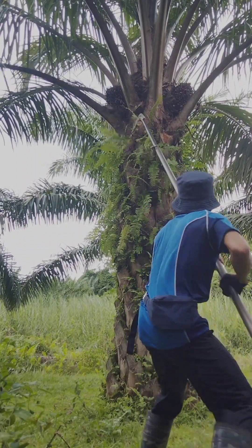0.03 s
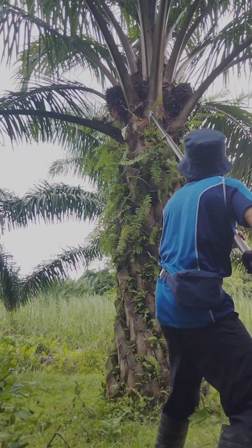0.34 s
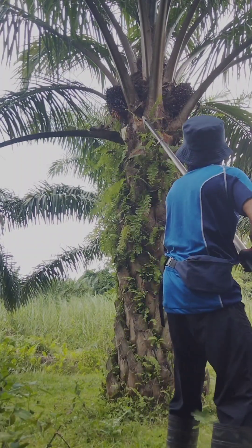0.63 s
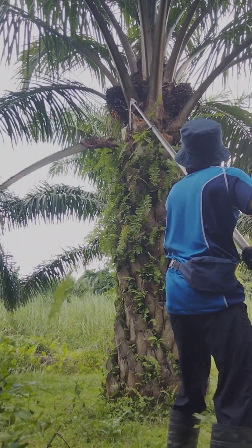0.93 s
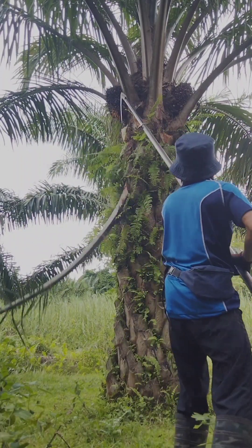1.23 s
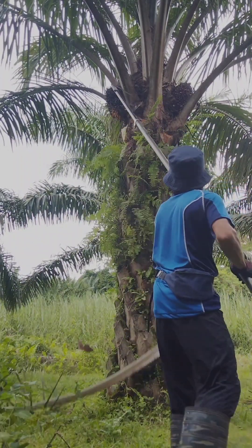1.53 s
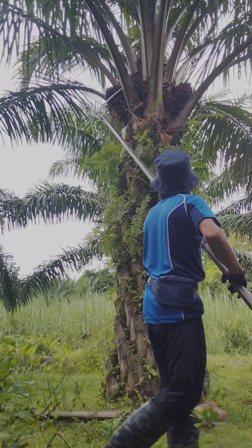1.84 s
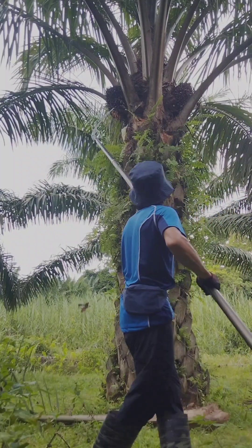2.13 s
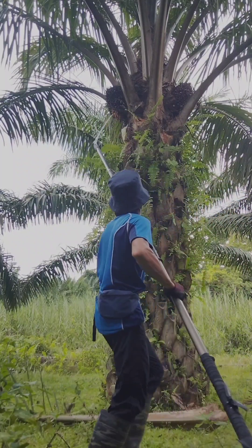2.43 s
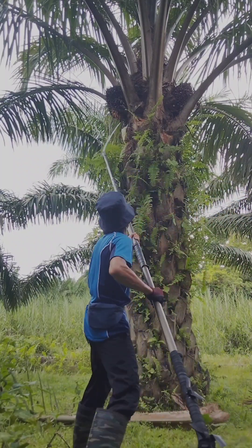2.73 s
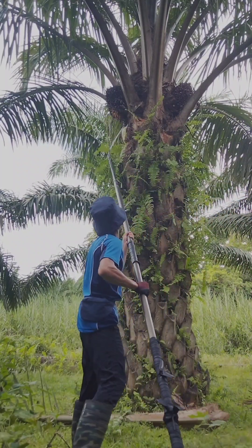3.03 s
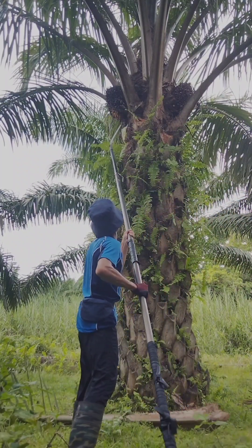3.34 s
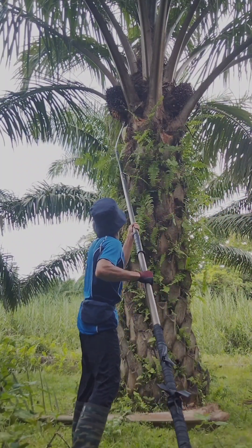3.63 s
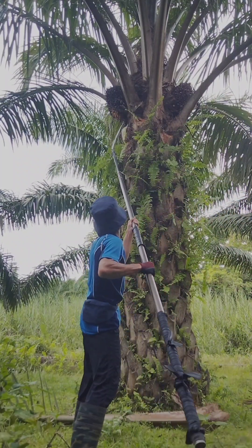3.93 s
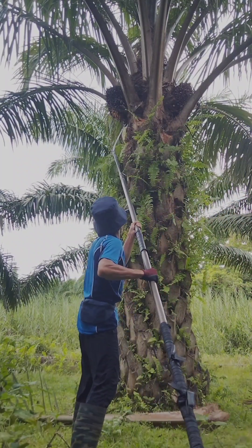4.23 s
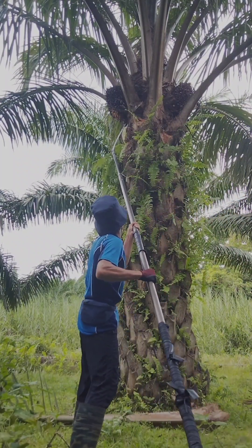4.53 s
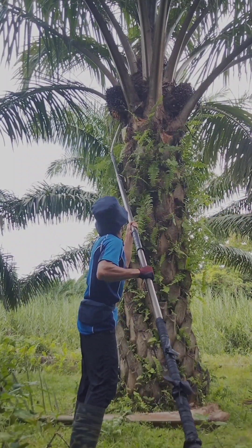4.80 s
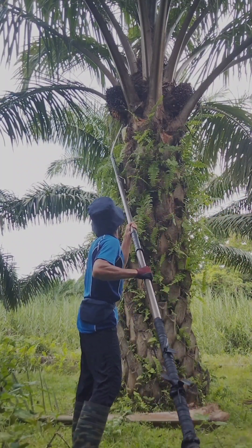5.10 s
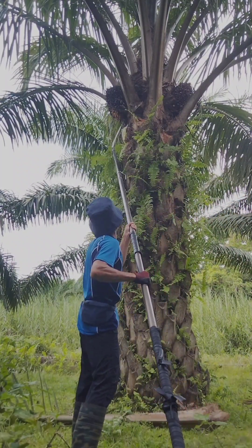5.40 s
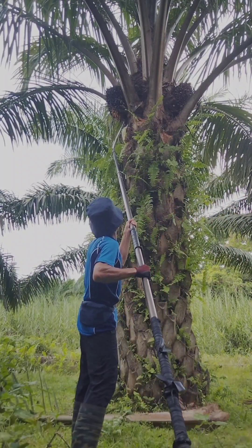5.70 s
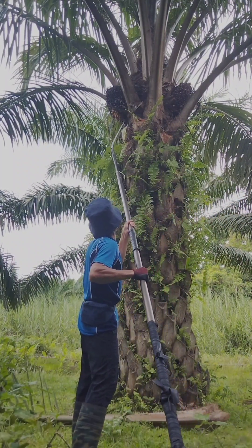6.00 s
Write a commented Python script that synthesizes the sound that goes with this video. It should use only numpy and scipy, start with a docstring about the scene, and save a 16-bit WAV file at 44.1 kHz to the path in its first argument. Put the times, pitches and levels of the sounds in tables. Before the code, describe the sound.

Woody cracks, rustling leaves and a thud as a palm frond falls, followed by light blade scrapes, insects and faint birds.

```python
"""Insects buzz and a far engine hums as a harvester cuts an oil palm frond with a sickle on a long pole.
The stalk tears in woody cracks, fibre by fibre, and the leaflets swish down; at 1.6 s the heavy butt
thumps on the grass and the frond settles. From 3 s the blade brushes and knocks through the ferns on the
trunk, pole and steel ringing along, while one far bird calls twice and another whistles faintly."""
import sys
import numpy as np
from scipy import signal
from scipy.fft import rfft, irfft
from scipy.io import wavfile

SR = 44100
rng = np.random.default_rng(int(sys.argv[2]) if len(sys.argv) > 2 else 0)


def generate_wav(signal):
    """Clip the signal to [-1, 1] and save it as 16-bit WAV at the path in sys.argv[1]."""
    frames = np.transpose(np.atleast_2d(signal))
    scaled = np.clip(frames, -1, 1) * 32767
    pcm = np.round(scaled).astype(np.int16)
    wavfile.write(sys.argv[1], SR, pcm)


N = 267246
TIME = np.arange(N) / SR

# Tone of the bed, far rumble up to leaf hiss: f/Hz, level/dB
AIR_EQ = [(20, -8), (43, -7), (58, -10), (85, 5), (170, 3.5), (280, 0), (550, -11), (1200, -11.5),
          (3500, -14), (6000, -19), (11000, -19), (14500, -13)]
# Partials of the engine hum: f/Hz, level/dB
ENGINE_PARTIALS = [(159, -69), (187, -68.5)]
# Insect choruses: f/Hz, width/Hz, level/dB
INSECT_BANDS = [(8560, 700, -66.5), (4650, 810, -79)]
# Bird phrase, a soft twitter and four slurs: t/s into the phrase, length/s, top f/Hz, drop/share, level/dB
BIRD_PHRASE = [(.02, .09, 3850, .13, -62), (.137, .046, 3800, .18, -55), (.184, .04, 3500, .33, -51.5),
               (.254, .054, 3750, .38, -51), (.316, .044, 2900, .35, -55.5)]
# Cues for that phrase: t/s
PHRASE_CUES = [3.198, 4.74]
# The second bird's whistles: t/s, f/Hz
BIRD_WHISTLES = [(2.92, 4700), (4.457, 4620), (4.575, 4230), (6.02, 4700)]

# The blade brushes the ferns: t/s, rise/s, level/dB
FERN_BRUSHES = [(2.981, 0.035, -46.5), (3.308, 0.026, -42), (3.515, 0.029, -47.5), (3.691, 0.012, -37.5),
                (3.725, .01, -40.5), (3.935, 0.019, -49.5), (3.978, 0.0096, -42.5), (4.2, 0.035, -55.5),
                (4.318, 0.013, -45.5), (4.861, 0.04, -41), (5.287, 0.008, -34), (5.621, .008, -37),
                (5.87, .025, -50)]
# The blade knocks on the trunk: t/s, level/dB
TRUNK_KNOCKS = [(2.971, -55), (3.305, -41.5), (3.52, -46.5), (3.719, -42), (3.927, -47), (3.977, -40),
                (4.107, -47.5), (4.313, -43.5), (4.85, -45.5), (5.283, -46.5)]
# Tone of the ferns and of the trunk: f/Hz, level/dB
FERN_EQ = [(150, -7.5), (700, -7.5), (2200, -2), (3700, 1.5), (6000, 2.5), (9000, 5), (13000, 3),
           (16000, 6)]
TRUNK_EQ = [(80, -31), (250, -2), (550, -2.5), (1000, -0.5), (1700, -3.5), (2700, -11), (8000, -51)]
# Ring of the steel blade and of the hollow pole: f/Hz, width/Hz, level/dB
STEEL_RING = [(2149, 11, 14.5), (3320, 32, -15.5), (3590, 53, -2.5), (4800, 40, 1), (5310, 71, 1),
              (6250, 160, -3)]
POLE_RING = [(423, 32, 3.1), (636, 15, 13.4), (1142, 28, 1.7), (1630, 16, 1.8), (2194, 25, 1.4)]

# Rustle of the frond as it swings down, then as it flops over and settles in the grass: t/s, level/dB
FALL_ENVELOPE = [(0.0, -20), (0.11, -34), (0.132, -29.5), (0.322, -37), (0.38, -33), (0.744, -37.5),
                 (0.876, -27), (1.0, -34), (1.168, -34.5), (1.23, -30.5), (1.314, -34), (1.364, -28),
                 (1.59, -31)]
SETTLE_ENVELOPE = [(1.615, -26.5), (1.685, -27), (1.747, -24.5), (1.867, -35.5), (1.889, -30), (2.139, -39),
                   (2.237, -46.5), (2.805, -55.5), (2.88, -57)]
# Short bright ticks: single leaflets snap, and the tick at 1.61 s sharpens the stalk's split: t/s, level/dB
LEAFLET_SNAPS = [(0.1517, -20.5), (1.6095, -11), (2.087, -26), (2.456, -37), (2.7873, -39), (3.686, -26),
                 (5.263, -35)]
# Tone of the leaflets and of the low swish: f/Hz, level/dB
LEAF_EQ = [(100, -39), (500, -9.5), (1300, -10), (2200, -10), (3300, -4.5), (5000, -2), (9000, 0),
           (16000, -3.5)]
SWISH_EQ = [(30, -69), (70, -6), (150, 3.5), (300, 0.5), (600, 0), (1000, -4.5), (2000, -14), (6000, -61)]

# The stalk crushes its own base, then the ferns, at last the grass: t/s, level/dB
CRUNCH_HITS = [(0.01, -29), (.89, -42), (1.632, -32), (1.735, -42.5)]
# Tone of that crunch: f/Hz, level/dB
CRUNCH_EQ = [(150, -28), (450, -1), (720, 0), (1100, -18), (3000, -38)]
# The stalk hits the ground, thin end first: t/s, f/Hz, level/dB, t60/s
GROUND_THUMPS = [(1.611, 565, -24.5, 0.098), (1.617, 276, -24.5, 0.124), (1.633, 464, -15.5, 0.022),
                 (1.643, 164.3, -20.5, 0.1), (1.731, 300, -31.5, 0.025), (1.797, 130, -20.5, 0.017)]

# Fibres of the stalk give way: t/s, length/s, level/dB
FIBRE_CRACKS = [(.01, 0.017, -18.5), (0.04, 0.041, -22), (0.103, 0.0093, -29), (0.161, 0.013, -30.5),
                (.237, 0.0097, -29.5), (0.283, 0.011, -30.5), (0.346, 0.0098, -27.5), (0.401, 0.016, -29.5),
                (.51, 0.01, -21), (0.75, 0.0072, -36), (0.903, 0.013, -32.5), (1.226, 0.021, -33),
                (1.289, 0.019, -36), (1.384, 0.0072, -26.5), (1.618, 0.0065, -29), (1.732, 0.014, -50)]
# The stalk splits with a sharp, bright report: t/s, length/s, level/dB
STALK_SPLITS = [(1.2342, 0.0028, -15.5), (1.6124, 0.028, -24)]
# Pan of the woody cracks: t/s, left minus right/dB
CRACK_PAN = [(.03, 9), (.2, 3), (1.4, -2.5), (1.6, 6)]
# Tone of the breaking wood: f/Hz, level/dB
WOOD_EQ = [(60, -23), (200, -13.5), (480, -9), (750, -0.5), (1200, -4), (2000, 1), (3200, 4), (8000, -57)]
# Ring of the stalk: f/Hz, width/Hz, level/dB
STALK_RING = [(540, 140, -7), (800, 56, -30), (1193, 52, 6), (1641, 18, 10.5), (2040, 39, -2),
              (2595, 63, 4.5)]

# Each microphone port has its own resonance: f/Hz, level/dB
LEFT_PORT_EQ = [(100, -2), (600, 0), (1500, -0.5), (3600, -1), (5300, -11), (9000, -10), (12000, -5),
                (14000, 1), (15800, -15)]
RIGHT_PORT_EQ = [(100, 0.78), (1300, 3.17), (2600, 6.1), (4400, 2.8), (6300, 3.6), (7500, 8.4),
                 (8300, 11.9), (8850, 17.1), (9300, 17.8), (10000, 11.9), (11000, 8.6), (14300, 5.6),
                 (15600, 9.3)]


def from_db(db):
    """Fader level to linear gain."""
    return 10 ** (np.asarray(db) / 20)


def rms_one(x):
    """Normalise to an rms of 1."""
    return x / np.sqrt(np.mean(x ** 2) + 1e-20)


def panned(left_db):
    """Stereo gains for a fixed or moving left-minus-right level."""
    return from_db(np.vstack([left_db, -left_db]) / 2)


def from_ahead(x):
    """Place a source just right of centre: it reaches the left side 6 samples late."""
    return np.array([np.interp(TIME - 6 / SR, TIME, x), x])


def drift(rate_hz):
    """Random modulator that glides from value to value; rms 1."""
    knots = rng.standard_normal(int(N / SR * 400))
    return rms_one(np.interp(TIME * rate_hz, np.arange(len(knots)), knots))


def equalised(x, curve, size=4096):
    """Minimum-phase EQ that follows a curve of f/Hz, level/dB."""
    hz, db = np.transpose(curve)
    grid = np.maximum(np.arange(size // 2 + 1) * SR / size, 1)
    gain = from_db(np.interp(np.log(grid), np.log(hz), db))
    cepstrum = irfft(np.log(gain))
    cepstrum[1:size // 2] *= 2
    cepstrum[size // 2 + 1:] = 0
    impulse = irfft(np.exp(rfft(cepstrum)))
    return signal.oaconvolve(x, impulse[None], axes=-1)[:, :N]


def stereo_noise(focus):
    """White noise, from fully wide (focus 0) to a point source (focus 1)."""
    shared = from_ahead(rng.standard_normal(N))
    return np.sqrt(focus) * shared + np.sqrt(1 - focus) * rng.standard_normal((2, N))


def grains(curve, per_s, spread_db, grain_s, focus):
    """Texture of countless tiny contacts of uneven size, each a fast-dying noise burst; rms 1."""
    sizes = from_db(spread_db * np.minimum(rng.exponential(1, N), 4))
    onsets = rng.random(N) < per_s / SR
    power = signal.lfilter([1], [1, -np.exp(-2 / (grain_s * SR))], onsets * sizes ** 2 + 1e-18)
    return rms_one(equalised(np.sqrt(power) * stereo_noise(focus), curve))


def hit_envelope(hits):
    """Each hit (t/s, rise/s, fall/s, level/dB) swells to its peak at t and dies away."""
    power = np.zeros(N)
    for s, rise, fall, db in hits:
        near = slice(max(int((s - .2) * SR), 0), int((s + .4) * SR))
        t = TIME[near] - s
        decay = np.minimum(np.abs(t) / np.where(t < 0, rise, fall), 20)
        power[near] += (from_db(db) * np.exp(-decay)) ** 2
    return np.sqrt(power)


def ringing(x, modes):
    """Layer a body's resonances over the contact noise; rms 1."""
    out = x
    for hz, width, db in modes:
        out = out + from_db(db) * signal.lfilter(*signal.iirpeak(hz, hz / width, fs=SR), x)
    return rms_one(out)


def butter(x, order, hz, kind="low"):
    """Butterworth low-, high- or band-pass."""
    return signal.sosfilt(signal.butter(order, hz, kind, fs=SR, output="sos"), x)


def among_palms(x, wet_db, t60, predelay_s=.006):
    """Trunks and crowns scatter a short, thin reverb tail."""
    t = TIME[:SR // 2]
    tail = rng.standard_normal((2, len(t))) * from_db(-60 * t / t60) * (t > predelay_s)
    tail /= np.sqrt(np.sum(tail ** 2, axis=1, keepdims=True))
    return x + from_db(wet_db) * signal.oaconvolve(x, tail, axes=-1)[:, :N]


def ground_bounce(x, delay_s, echo_db, grass_hz):
    """Sound from high on the palm also arrives off the ground, later and duller, and turns hollow."""
    echo = np.pad(x, [(0, 0), (round(delay_s * SR), 0)])[:, :N]
    return x + from_db(echo_db) * butter(echo, 1, grass_hz)


def plantation(air_db):
    """The bed: far rumble, leaf hiss, a wavering engine hum and narrow bands of insect buzz."""
    receding = from_db(np.interp(TIME, [2.6, 5.8], [2.0, -1.5]))   # the engine slowly moves away
    rumble = receding * butter(stereo_noise(1.0), 2, 600)
    hiss = butter(stereo_noise(0.094), 2, 600, "high")
    bed = from_db(air_db + drift(4.384)) * rms_one(equalised(rumble + hiss, AIR_EQ))
    for hz, db in ENGINE_PARTIALS:
        level = receding * from_db(db + 2.0 * drift(21))
        pitch = hz + 2.63 * drift(6.2)
        bed += level * np.sin(2 * np.pi * np.cumsum(pitch) / SR)
    for hz, width, db in INSECT_BANDS:
        level = from_db(db + 0.62 * drift(13))
        buzz = butter(stereo_noise(0.081), 2, [hz - width / 2, hz + width / 2], "band")
        bed += level * rms_one(buzz)
    return bed * panned(-4.0)


def birds(waver=.03, flutter_db=5.0, swell_db=5, whistle_s=.03, whistle_db=-63):
    """One bird repeats rough notes that rise, turn and swell as they drop; another adds thin whistles."""
    out = np.zeros(N)
    unsteady = 1 + waver * drift(220)
    flutter = flutter_db * drift(180)
    turn = .35   # the pitch peaks this far through a note
    for cue in PHRASE_CUES:
        for s, length, top_hz, drop, db in BIRD_PHRASE:
            note = int((cue + s) * SR) + np.arange(int(length * SR))
            along = np.linspace(0, 1, len(note))
            pitch = top_hz * (1 - drop * np.abs(along - turn) / (1 - turn)) * unsteady[note]
            level = from_db(db + flutter[note] - swell_db * (1 - along))
            fades = signal.windows.tukey(len(note), .2)
            out[note] += level * fades * np.sin(2 * np.pi * np.cumsum(pitch) / SR)
    for s, hz in BIRD_WHISTLES:
        level = from_db(whistle_db) * np.exp(-((TIME - s) / whistle_s) ** 2)
        out += level * np.sin(2 * np.pi * np.cumsum(hz * unsteady) / SR)
    return from_ahead(out)


def sickle(fern_fall_s=0.042, knock_rise_s=0.0051, knock_fall_s=0.015, scuff_db=-12.5):
    """The blade scuffs the fibrous trunk and shakes the ferns; the pole and the steel ring along."""
    brushes = hit_envelope([(s, rise, fern_fall_s, db) for s, rise, db in FERN_BRUSHES])
    knocks = hit_envelope([(s, knock_rise_s, knock_fall_s, db) for s, db in TRUNK_KNOCKS])
    on_trunk = np.hypot(knocks, from_db(scuff_db) * brushes)   # every brush also scuffs the trunk
    scuff = grains(TRUNK_EQ, per_s=1000, spread_db=3.0, grain_s=0.0012, focus=0.82)
    ferns = grains(FERN_EQ, per_s=4500, spread_db=3.5, grain_s=0.0019, focus=0.24)
    pole = on_trunk * ringing(scuff, POLE_RING) * panned(0.62)
    blade = brushes * ringing(ferns, STEEL_RING) * panned(-0.16)
    return pole + blade


def falling_frond(rustle_db, swish_db, settle_db_per_s=5):
    """Leaflets brush each other as the frond swings down and settles; a low swish adds body."""
    s, db = np.transpose(np.vstack([FALL_ENVELOPE, SETTLE_ENVELOPE]))
    fade_db = settle_db_per_s * np.maximum(TIME - s[-1], 0)
    motion = from_db(np.interp(TIME, s, db) - fade_db)
    rustle = from_db(rustle_db) * grains(LEAF_EQ, per_s=4100, spread_db=2.5, grain_s=0.0063, focus=0.37)
    swish = from_db(swish_db) * grains(SWISH_EQ, per_s=1300, spread_db=1.5, grain_s=0.0036, focus=1.0)
    left_db = np.interp(TIME, [.3, 1.1, 1.65, 2.4], [3.0, 4, 5.5, -2.0])   # it falls to the left
    return motion * (rustle + swish) * panned(left_db)


def leaflet_snaps(fall_s):
    """Dry leaflets break with one short tick each; one tick also sharpens the stalk's split."""
    clicks = np.zeros(N)
    for s, db in LEAFLET_SNAPS:
        clicks[int(s * SR)] = from_db(db)
    envelope = signal.lfilter([1], [1, -np.exp(-1 / (fall_s * SR))], clicks + 1e-18)
    return envelope * equalised(stereo_noise(0.88), LEAF_EQ)


def crunch(rise_s, fall_s):
    """Fibres and stems give way under the heavy stalk with a dull crunch."""
    weight = hit_envelope([(s, rise_s, fall_s, db) for s, db in CRUNCH_HITS])
    stems = grains(CRUNCH_EQ, per_s=1200, spread_db=2.5, grain_s=0.0024, focus=0.82)
    return weight * stems * panned(5.0)


def landing(low_cut_hz):
    """Ever heavier parts of the stalk meet the soft ground in a run of damped thuds."""
    thuds, t = np.zeros(N), TIME[:SR // 2]
    for s, hz, db, t60 in GROUND_THUMPS:
        start = int(s * SR)
        thuds[start:start + len(t)] += from_db(db - 60 * t / t60) * np.sin(2 * np.pi * hz * t)
    thuds = butter(thuds, 3, low_cut_hz, "high")   # a narrow stalk radiates little deep bass
    return from_ahead(thuds) * panned(6.4)


def tearing_stalk(wood_top_hz=1990, splinter_db=-8.5, crack_rise_share=0.59, split_rise_s=.0008):
    """Fibre bundles break in quick runs; the stalk lends a woody ring, splinters a bright edge."""
    fibres = grains(WOOD_EQ, per_s=760, spread_db=1.0, grain_s=0.00086, focus=0.94)
    wood = butter(ringing(fibres, STALK_RING), 3, wood_top_hz)
    splinters = grains(LEAF_EQ, per_s=3500, spread_db=3.3, grain_s=0.00033, focus=0.24) * panned(14.0)
    cracks = hit_envelope([(s, crack_rise_share * length, length, db) for s, length, db in FIBRE_CRACKS])
    splits = hit_envelope([(s, split_rise_s, length, db) for s, length, db in STALK_SPLITS])
    body = cracks * wood * panned(np.interp(TIME, *np.transpose(CRACK_PAN)))
    edge = (from_db(splinter_db) * cracks + splits) * splinters
    return body + edge


def scene():
    """The mix: the work up the palm and below it, wetter birds for distance, and the bed."""
    aloft = ground_bounce(tearing_stalk() + sickle(), delay_s=.0039, echo_db=-12.0, grass_hz=5100)
    leaves = falling_frond(rustle_db=-2.5, swish_db=-18.5) + leaflet_snaps(fall_s=0.0016)
    impacts = landing(low_cut_hz=101) + crunch(rise_s=0.009, fall_s=.035)
    far_birds = among_palms(birds(), wet_db=-8.0, t60=.4)
    harvest = among_palms(aloft + leaves + impacts, wet_db=-14.0, t60=0.47)
    return plantation(air_db=-57.5) + far_birds + harvest


def record(dry):
    """Two unlike microphone ports colour the sides; a steep low-pass takes off the very top."""
    ported = np.vstack([equalised(dry[:1], LEFT_PORT_EQ), equalised(dry[1:], RIGHT_PORT_EQ)])
    return signal.sosfilt(signal.ellip(12, .1, 80, 15900, fs=SR, output="sos"), ported)


dry = scene()
out = record(dry)
generate_wav(out)
```